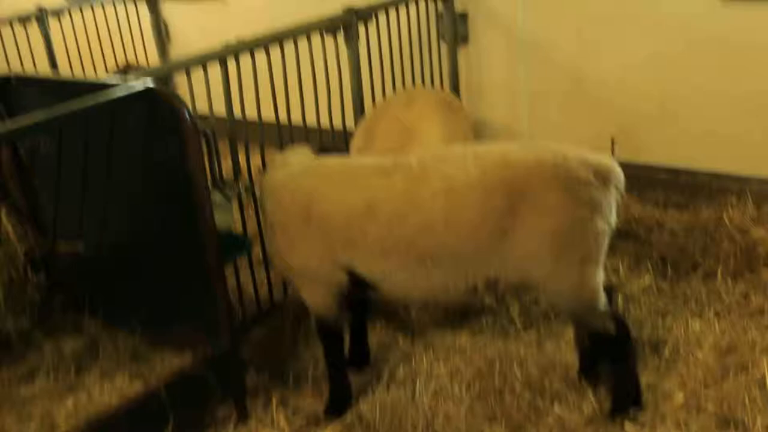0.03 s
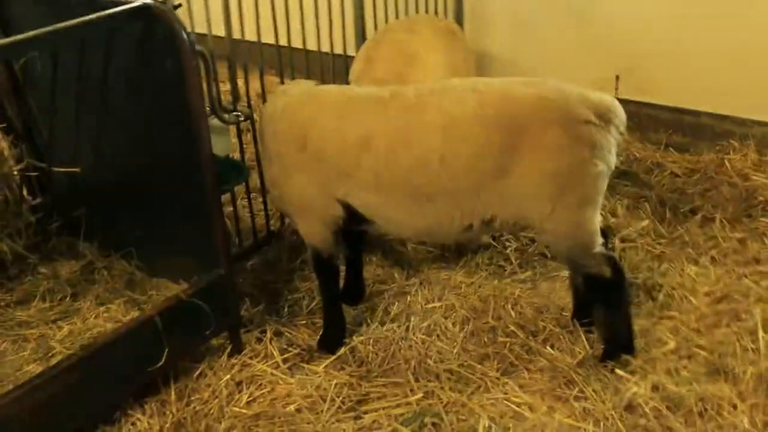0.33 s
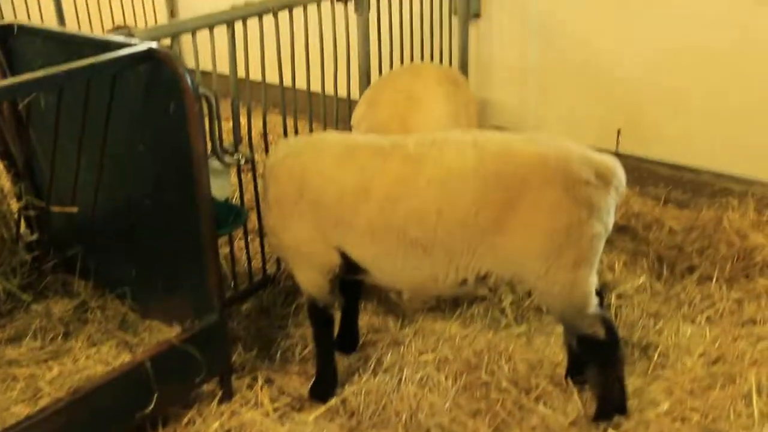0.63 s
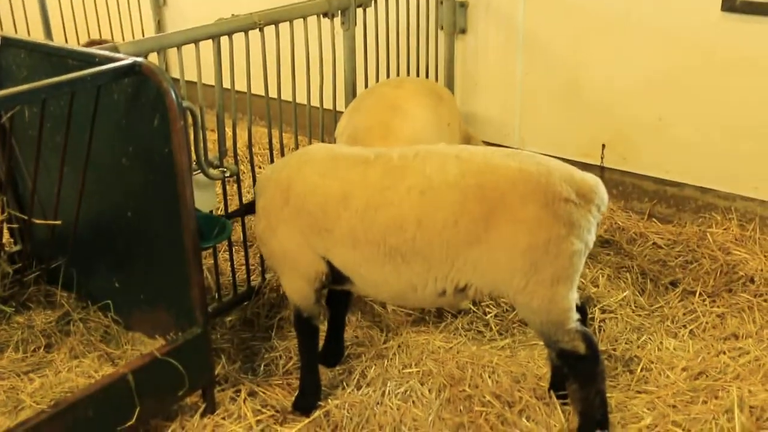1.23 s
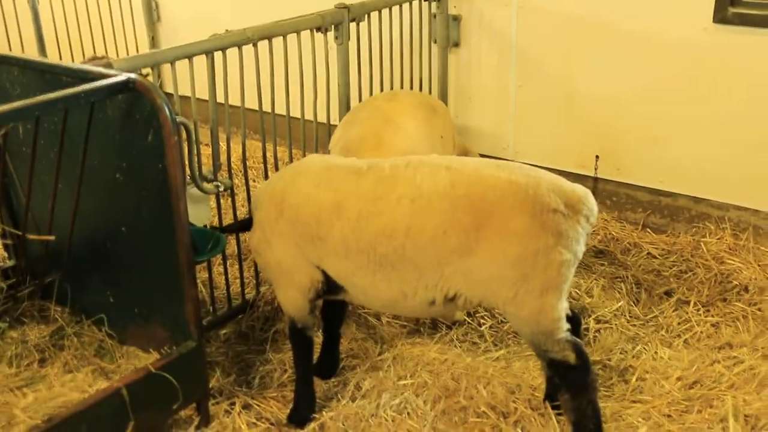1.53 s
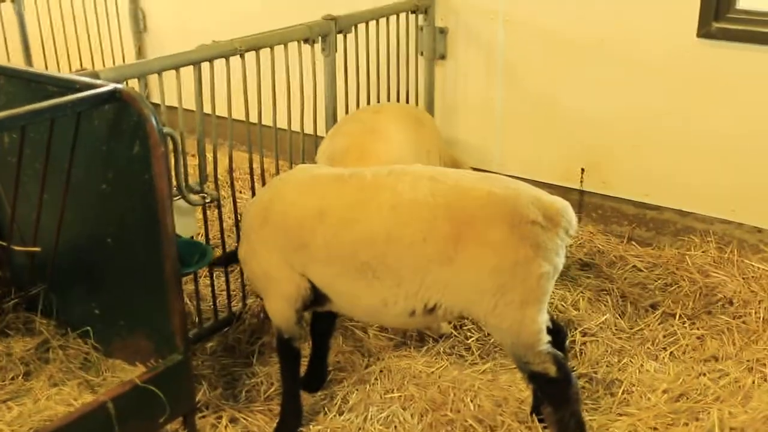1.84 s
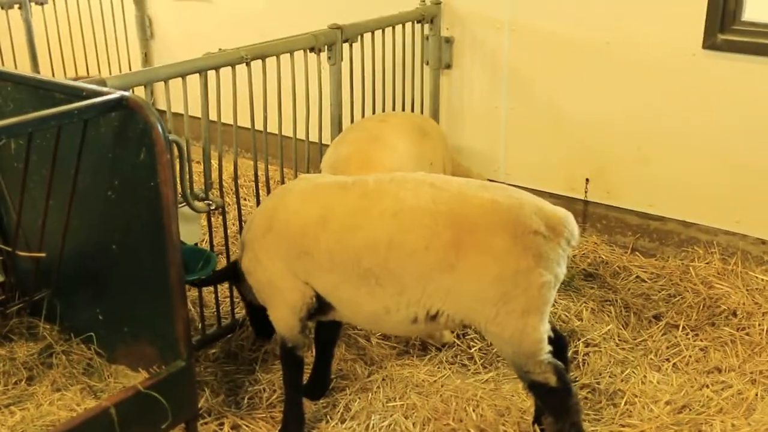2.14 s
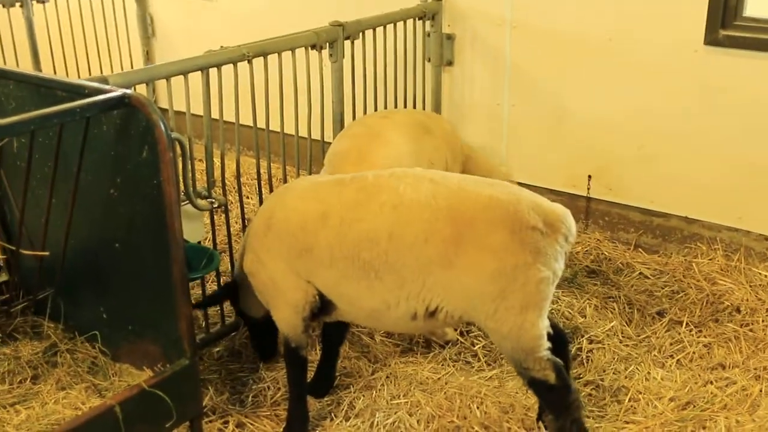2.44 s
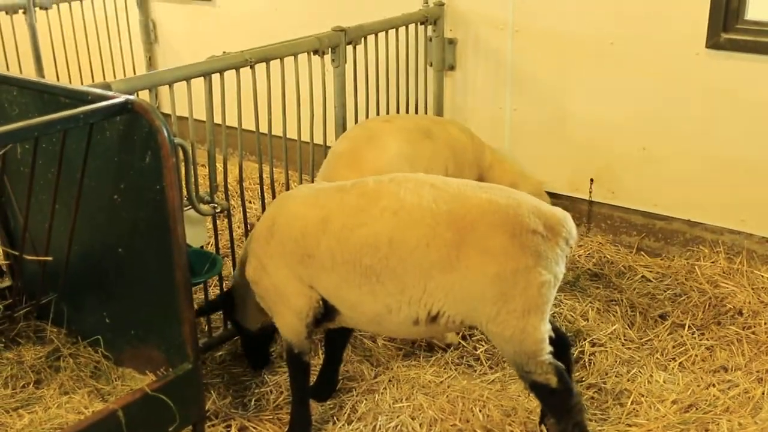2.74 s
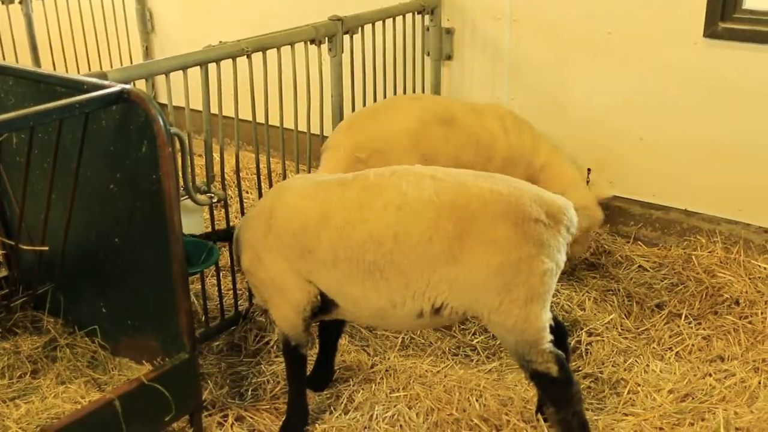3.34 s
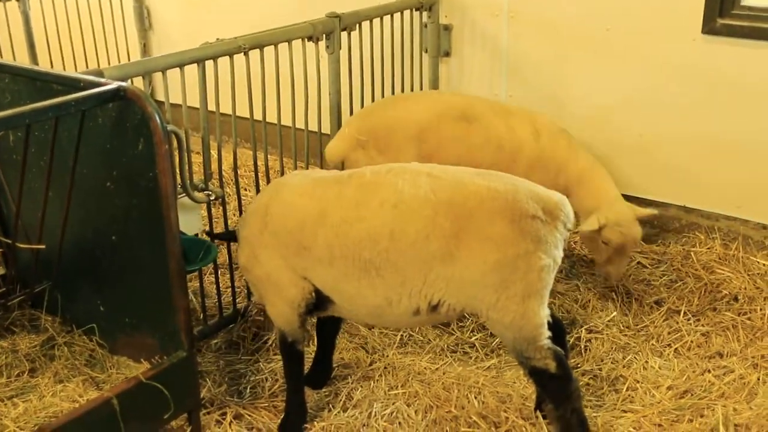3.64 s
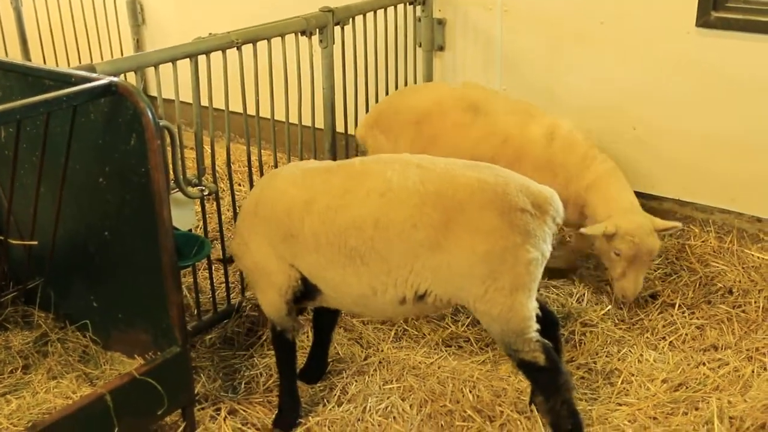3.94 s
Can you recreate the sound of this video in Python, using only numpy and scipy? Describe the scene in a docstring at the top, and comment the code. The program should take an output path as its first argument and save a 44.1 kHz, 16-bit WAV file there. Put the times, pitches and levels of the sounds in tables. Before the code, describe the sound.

A steady rush of ventilation fills an indoor sheep pen, with a low fan hum and a wavering duct drone. A few metres off, slightly left, a sheep moves through dry straw, its faint rustles and hoof crunches gradually growing.

```python
"""A broad rush of ventilation cuts in just after the start, heard on a stereo pair in an indoor sheep pen.
In it are the hum of the fan's blades, the mains buzz of its motor and a wavering drone from the duct.
A few metres off, a little to the left, a sheep moves through the straw bedding: dry stalks snap in soft
rustles that grow as it comes round, with a duller crunch where a hoof presses down."""
import sys
import numpy as np
from scipy import signal
from scipy.fft import rfft, irfft, next_fast_len
from scipy.io import wavfile
from scipy.ndimage import uniform_filter1d, map_coordinates

SR = 44100
rng = np.random.default_rng(int(sys.argv[2]) if len(sys.argv) > 2 else 0)


def wrap_up_sound(samples):
    """Save the sound to the file named by the first command line argument, as 16-bit audio."""
    columns = np.atleast_2d(samples).T
    # keep every value between -1 and 1, then stretch to whole-number steps
    tamed = np.clip(columns, -1, 1)
    steps = np.round(tamed * 32767).astype(np.int16)
    wavfile.write(sys.argv[1], SR, steps)


N = 176400
T = np.arange(N) / SR


def amp(db):
    """Decibels to gain."""
    return 10 ** (np.asarray(db) / 20)


def unit(x):
    """Scaled to rms 1."""
    return x / np.sqrt(np.mean(x ** 2) + 1e-20)


def along(points, hz):
    """(Hz, value) points joined on a log axis, read at hz."""
    freqs, values = np.transpose(points)
    return np.interp(np.log(hz + 1), np.log(freqs + 1), values)


def curve(rows):
    """(s, value) points joined, one value per sample."""
    return np.interp(T, *np.transpose(rows))


def wobble(rate):
    """A smooth random curve, rate knots a second."""
    return map_coordinates(rng.standard_normal(256), [T * rate], mode="wrap")


def filtered(x, response):
    """x times a complex response of frequency."""
    size = next_fast_len(N + SR // 2)
    return irfft(rfft(x, size) * response(np.fft.rfftfreq(size, 1 / SR)), size)[..., :N]


def pan(x, db):
    """Left raised and right lowered by db."""
    return x * amp([[db], [-db]])


# The rush that fills the pen. Each row: frequency in Hz, relative level in dB.
AIR_SPECTRUM = [(20, -27), (45, -16.5), (70, -9), (100, -8), (132, -9.5), (160, -1.5), (280, -1),
                (440, -3.5), (560, -7), (900, -9), (1400, -13.5), (2100, -17), (3000, -23.5), (4400, -27),
                (5400, -31), (9800, -42.5), (12500, -50.5), (15500, -59)]
# The air at the two microphones. Each row: frequency in Hz, left-right likeness from 0 to 1.
AIR_LIKENESS = [(60, .999), (160, .994), (330, .982), (700, .92), (1400, .73), (2000, .57), (3500, .22),
                (5700, .38), (9000, .07), (15000, .1)]

def air(level_db, patchy_db):
    """A diffuse, slightly uneven rush: alike at both microphones in the bass, unrelated in the treble."""
    cells = signal.stft(rng.standard_normal((2, N)), nperseg=512)[2]
    patches = uniform_filter1d(rng.standard_normal(cells.shape[1:]), size=6, axis=0)
    patches = unit(uniform_filter1d(patches, size=12, axis=1))
    noise = signal.istft(cells * amp(patchy_db * patches), nperseg=512)[1][:, :N]

    def mid_and_side(hz):
        spread = np.arccos(along(AIR_LIKENESS, hz)) / 2
        return amp(along(AIR_SPECTRUM, hz)) * [np.cos(spread), np.sin(spread)]

    mid, side = filtered(noise, mid_and_side)
    return amp(level_db) * unit(np.array([mid + side, mid - side]))


# The blade hum as it reaches the pen. Each row: time in seconds, level in dB.
BLADE_LEVEL = [(.1, -24), (.65, -26), (1.02, -36.5), (1.4, -32.5), (1.85, -26), (2.3, -23), (2.8, -20.5),
               (3.95, -21)]
# Overtones of the blades and of the motor. Each row: multiple of the fundamental, level in dB.
BLADE_OVERTONES = [(2, -37.5), (3, -34), (4, -44.5)]
MOTOR_OVERTONES = [(2, -33), (6, -35.5)]

def fan(blade_hz, mains_hz, speed_drift):
    """Blade tone with unsteady overtones, and the motor's buzz locked to the mains."""
    def tone(cycles, db, waver_db):
        peak = np.sqrt(2) * amp(db + waver_db * wobble(5.07))
        return peak * np.sin(2 * np.pi * (cycles + rng.random()))

    passes = np.cumsum(blade_hz * (1 + speed_drift * wobble(3))) / SR
    hum = tone(passes, curve(BLADE_LEVEL), waver_db=-.67)
    overtones = sum(tone(k * passes, db, waver_db=3.5) for k, db in BLADE_OVERTONES)
    buzz = sum(tone(k * mains_hz * T, db, waver_db=1) for k, db in MOTOR_OVERTONES)
    return hum + overtones + buzz


def ring(modes):
    """Turbulence keeps narrow resonances sounding."""
    def band(hz, width):
        return unit(filtered(rng.standard_normal(N), lambda f: 1 / (1 + ((f - hz) / width) ** 2)))

    return sum(amp(db) * band(hz, width) for hz, width, db in modes)


# Resonances of duct and room. Each row: frequency in Hz, half-width in Hz, level in dB.
DUCT_MODES = [(178.7, 6.2, -33), (383.6, 11.3, -35), (658, 33, -39), (997, 22, -39), (1250, 25, -47.5)]
# The drone in the duct. Each row: frequency in Hz, half-width in Hz, relative level in dB.
DRONE_RESONANCES = [(237.5, 6.8, 1), (265.4, 10.7, -3)]
# The drone as it reaches the pen. Each row: time in seconds, level in dB.
DRONE_LEVEL = [(.1, -26.5), (.7, -27), (1.17, -23.5), (1.38, -32), (1.82, -43), (2.0, -28), (2.35, -24.5),
               (2.55, -39), (2.8, -39), (3.0, -25.5), (3.95, -27.5)]

def duct():
    """The air excites steady resonances, and a throbbing drone that comes and goes."""
    drone = ring(DRONE_RESONANCES)
    slow_rms = np.sqrt(np.abs(uniform_filter1d(drone ** 2, size=SR // 5)) + 1e-12)
    return ring(DUCT_MODES) + amp(curve(DRONE_LEVEL)) * drone / slow_rms


def stalks(spectrum, blur_db, snaps_per_s=3000, scatter_db=3):
    """Countless tiny snaps of dry stalks, partly blurred by the room."""
    snaps = (rng.random((2, N)) < snaps_per_s / SR) * rng.standard_normal((2, N))
    snaps *= amp(scatter_db * rng.standard_normal(N))
    blur = amp(blur_db) * rng.standard_normal((2, N))
    return unit(filtered(unit(snaps) + blur, lambda hz: amp(along(spectrum, hz))))


# Bedding stirred a few metres off. Each row: time in seconds, level in dB.
STIR_LEVEL = [(0, -76), (1.25, -70), (1.65, -51), (2.5, -50.5), (2.9, -46), (3.4, -47), (4, -44.5)]
# Its colour. Each row: frequency in Hz, relative level in dB.
STIR_SPECTRUM = [(1000, -14), (3000, -3), (7000, 0.5), (10000, -2), (13500, -5), (15700, -10)]

def stirring():
    """The straw shifts constantly under the sheep, louder as it comes round."""
    return amp(curve(STIR_LEVEL)) * stalks(STIR_SPECTRUM, blur_db=3)


def swells(rows, skew=.2):
    """Gain of strokes that rise faster and die slower by the share skew; lengths are at half power."""
    power = 0
    for peak_s, length, db in rows:
        half_length = length / 2 * (1 + skew * np.sign(T - peak_s))
        power += amp(db) ** 2 * .5 ** (((T - peak_s) / half_length) ** 2)
    return np.sqrt(power)


# Pushes through the straw. Each row: peak time in seconds, length in seconds, level in dB.
PUSHES = [(1.39, .08, -59), (1.68, .12, -51), (1.86, .13, -55), (2.135, .07, -49), (2.26, .09, -48),
          (2.42, .05, -54), (2.62, .1, -55), (2.83, .08, -50), (2.98, .12, -48), (3.17, .04, -53),
          (3.29, .11, -46), (3.495, .07, -41), (3.66, .08, -48), (3.755, .07, -45), (3.9, .04, -46),
          (3.97, .06, -50)]
# Their colour. Each row: frequency in Hz, relative level in dB.
RUSTLE_SPECTRUM = [(1000, -20), (3000, -10), (7000, 0), (10000, 2), (13500, 1), (15700, -7)]

def rustles():
    """Each push of the sheep snaps stalks in a short, bright swell."""
    return swells(PUSHES) * stalks(RUSTLE_SPECTRUM, blur_db=2)


# Steps on the pen floor. Each row: peak time in seconds, length in seconds, level in dB.
STEPS = [(1.588, .02, -47), (2.11, .04, -44), (3.27, .06, -43), (3.49, 0.065, -38.5), (3.61, .03, -39.5),
         (3.692, 0.022, -35.5), (3.74, .08, -41.5)]
# Their colour. Each row: frequency in Hz, relative level in dB.
CRUNCH_SPECTRUM = [(800, -20), (2500, -5), (4200, 3), (6500, -6), (10000, -10), (15000, -23)]

def hooves():
    """Hooves press the bedding down with a duller crunch."""
    return swells(STEPS) * stalks(CRUNCH_SPECTRUM, blur_db=-3)


# The ventilation at the pair. Each row: frequency in Hz, the left microphone's lead in radians.
LEFT_LEAD = [(20, 0), (500, -0.21), (1100, 0.47), (2000, .5), (3500, 1.55), (5600, 3), (8400, 4),
             (15000, 3.8)]

def scene():
    """Ventilation all around the microphones, the sheep a little to the left."""
    vent = air(level_db=-20.5, patchy_db=.5) + duct() + fan(blade_hz=77.3, mains_hz=60, speed_drift=.002)
    vent = filtered(vent, lambda hz: np.exp(.5j * along(LEFT_LEAD, hz) * np.array([[1], [-1]])))
    sheep = stirring() + rustles() + hooves()
    return pan(vent, db=.17) + pan(sheep, db=1.6)


START_S, TOP_HZ = .072, 15720

def record(dry):
    """The microphones are switched on abruptly; nothing passes above the band limit."""
    return filtered(dry * (T > START_S), lambda hz: hz < TOP_HZ)


dry = scene()
out = record(dry)
wrap_up_sound(out)
```